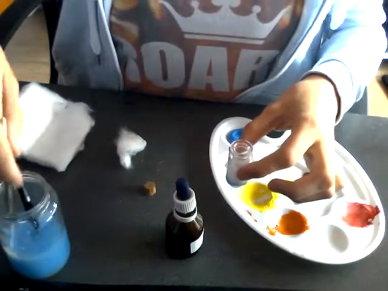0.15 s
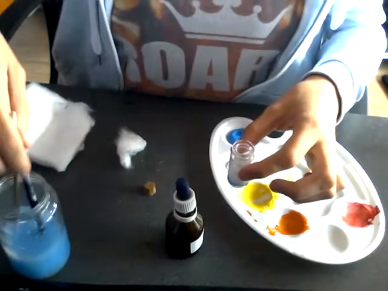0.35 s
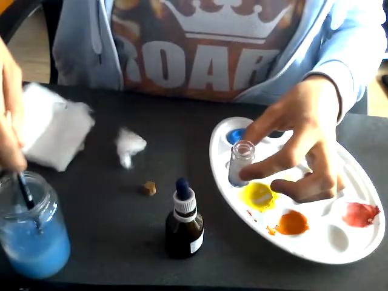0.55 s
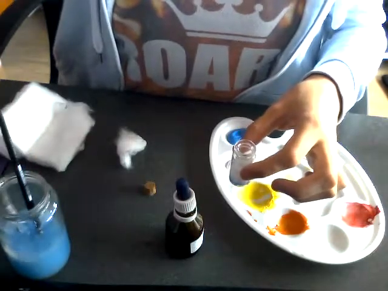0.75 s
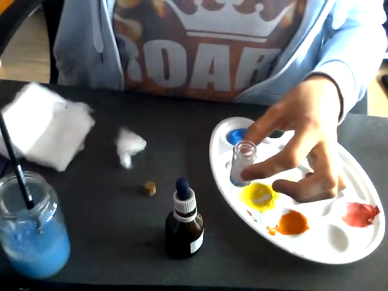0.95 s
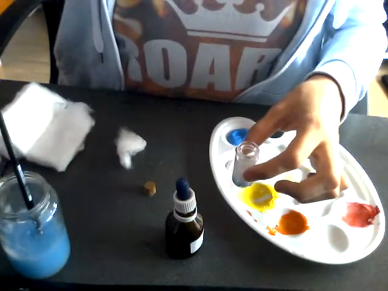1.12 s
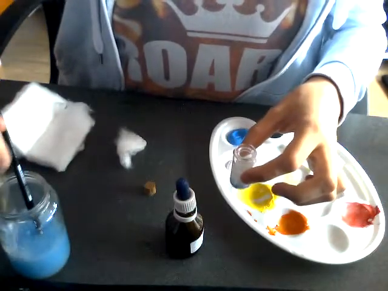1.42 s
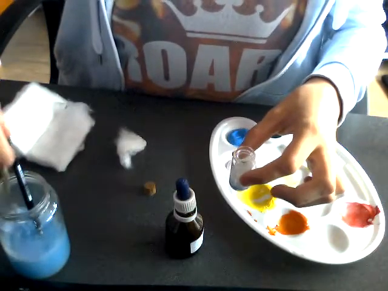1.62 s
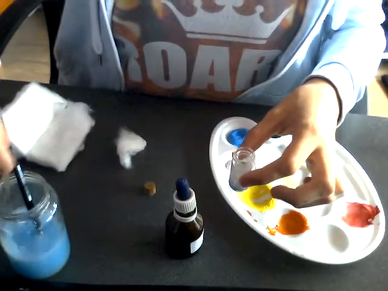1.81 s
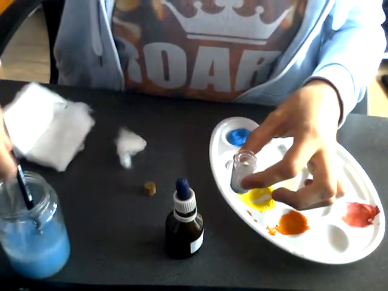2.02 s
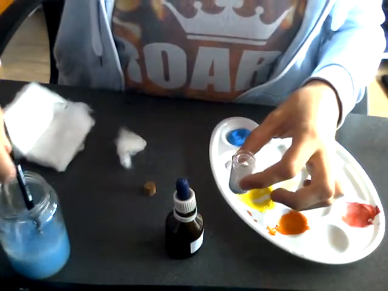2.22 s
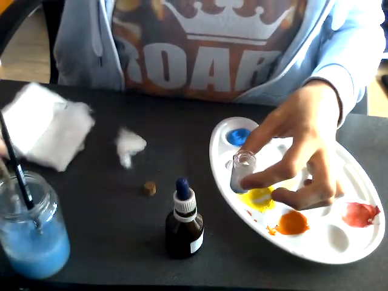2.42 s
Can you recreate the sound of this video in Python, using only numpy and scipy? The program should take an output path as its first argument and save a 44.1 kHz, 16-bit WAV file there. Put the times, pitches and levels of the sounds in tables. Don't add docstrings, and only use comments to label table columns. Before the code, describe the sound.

A paintbrush stirs water in a glass jar, heard close in a small quiet room. Light ticks lead to a bright, hard clink at 0.23 s, with gulping bubbles and knocks until 0.5. Sparser taps follow: a softer clink at 0.86, dull thumps around 1.0 and 1.25-1.45, a ringing clink at 1.53. Sloshing resumes from 1.7, with clinks at 2.13 and 2.27. Faint hiss, hum and a low throb continue underneath.

```python
import sys
import numpy as np
from scipy import signal
from scipy.fft import rfft, irfft
from scipy.io import wavfile
from scipy.ndimage import uniform_filter1d

SR = 44100
rng = np.random.default_rng(int(sys.argv[2]) if len(sys.argv) > 2 else 0)


def inscribe(sig):
    pcm = np.round(np.clip(np.atleast_2d(sig).T, -1, 1) * 32767)
    wavfile.write(sys.argv[1], SR, pcm.astype(np.int16))


def ratio_of_db(decibels):
    return 10 ** (np.asarray(decibels, float) / 20)


N = 112454
T = np.arange(6000) / SR
BINS = np.arange(513) * SR / 1024
EDGE_HZ, WIDE_EDGE_HZ = 15850, 16600
NARROW_OCTAVES = 0.05


def evened(x):
    return x / np.sqrt(np.mean(x ** 2) + 1e-20)


def read(points, hz):
    f, value = np.transpose(points)
    return np.interp(np.log(hz + 1), np.log(f + 1), value)


def add(mix, s, sound):
    part = mix[max(round(s * SR), 0):][:len(sound)]
    part += sound[:len(part)]


def coloured(x, db):
    cepstrum = irfft(np.maximum(db, -90) * np.log(10) / 20)
    cepstrum[1:512] *= 2
    cepstrum[513:] = 0
    response = irfft(np.exp(rfft(cepstrum)))
    return signal.fftconvolve(x, response)[:len(x)]


def low_passed(x, hz):
    return signal.oaconvolve(x, signal.firwin(511, hz, window=("kaiser", 9), fs=SR), "same")


def ring(db, spot_hz, octaves, length=1):
    # (f/Hz, level/dB, time to fall 60 dB/s)
    modes = [(3705, 0, 0.21), (4200, -7, 0.051), (4188, -1, 0.17), (4150, -1.5, 0.049), (5950, -0.5, 0.081),
             (6210, -6, 0.17), (6880, 3, 0.069), (7345, 0.5, 0.07), (8200, -1, 0.017), (8900, -10, 0.018),
             (9530, -8.5, 0.13), (10600, -4, 0.04), (11230, -2.5, 0.13), (13200, 1, .05)]
    hz, mode_db, t60 = np.transpose(modes)[:, :, None]
    near_db = np.maximum(-6 * (np.log2(hz / spot_hz) / octaves) ** 2, -34)
    scatter_db = 2 * rng.standard_normal(hz.shape)
    sizes = ratio_of_db(db + mode_db + near_db + scatter_db - 60 * T / (t60 * length))
    shake = evened(uniform_filter1d(rng.standard_normal(sizes.shape), size=150))
    sizes *= 1 + 0.5 * shake
    onset = np.minimum(T / 0.00065, 1)
    return (sizes * np.sin(2 * np.pi * hz * T)).sum(0) * onset


def burst(db, t60, colour_db, spike_db, wash_db):
    wash_fade = ratio_of_db(wash_db - 21.5 - 60 * T / 0.19)
    wash = wash_fade * np.minimum(T / 0.0064, 1) * rng.standard_normal(len(T))
    wash_shape_db = -6 * (np.log2((BINS + 50) / 9600)) ** 2 - 40 * (BINS > EDGE_HZ)
    wash = coloured(wash, colour_db + wash_shape_db)
    rattle = rng.standard_normal(len(T)) * ratio_of_db(-60 * T / t60)
    rattle[0] = ratio_of_db(spike_db)
    rattle = coloured(rattle, colour_db)
    return ratio_of_db(db) * (rattle + wash) / np.sqrt(np.mean(rattle[:100] ** 2))


def clinks():
    times = (.2277, .8565, 1.5272, 2.1265, 2.2714)
    levels = (-15, -31, -26, -23, -19.5)
    spikes = (15, 4, 17, 17, 15)
    washes = (-4.5, -6, -8, -4, -6)
    # (ring over crack level/dB, favoured mode f/Hz, hardness tilt/dB per octave)
    strikes = [
        (-11.5, 9500, -2.5),
        (-11, 5800, -9),
        (-8, 9400, -2),
        (-24, 9200, -3.5),
        (-30, 7900, -2.5),
    ]
    # (f/Hz, level/dB)
    crack = [(600, -31.5), (2000, -25.5), (3550, -22.5), (4550, -14), (6190, -10), (8800, 5), (12500, -1.5),
             (16500, -10)]
    out = np.zeros(N)
    for s, db, spike_db, wash_db, strike in zip(times, levels, spikes, washes, strikes):
        ring_db, spot_hz, tilt_db = strike
        colour_db = read(crack, BINS) + tilt_db * np.log2((BINS + 100) / 8000)
        add(out, s, burst(db, 0.017, colour_db, spike_db, wash_db))
        add(out, s, ring(db + ring_db, spot_hz, 0.24))
    return out


def touches():
    # (t/s, tick level/dB, tick centre f/Hz, ring over tick level/dB, favoured mode f/Hz)
    light = [(2.16, -49.5, 1720, -20, 4200), (0.039, -52, 4670, 4, 4250), (.107, -64, 6030, 0, 6880),
             (.203, -45.5, 4400, -7, 4200), (0.21, -46, 3640, -5, 5970), (0.3166, -41, 4500, -7.5, 4200),
             (.371, -41.5, 5100, -9, 5960), (0.3739, -42, 5200, -0.5, 5800), (0.381, -52, 6660, -3.5, 3700),
             (.46, -49, 3860, -7, 3740), (.4885, -54, 5000, -2, 5830), (.955, -42, 1890, 0.5, 4295),
             (1.2537, -62, 2500, 6.5, 4200), (1.368, -48, 1780, -17, 6880), (1.6705, -44.5, 2330, 0, 4020),
             (1.692, -60, 5000, -14, 4200), (1.7167, -53, 8900, -2, 4200), (1.7715, -49, 8100, -10, 8600),
             (1.8078, -57.5, 6050, 16, 8800), (1.867, -54.5, 10100, 3.5, 9650),
             (1.962, -55.5, 4000, -11, 4250), (2.097, -50, 8600, -12, 8700), (2.109, -54, 8600, -14, 4200),
             (2.243, -50, 6540, -6, 6880)]
    out = np.zeros(N)
    for s, db, tick_hz, ring_db, spot_hz in light:
        octaves_off = np.log2((BINS + 50) / tick_hz)
        floor_db = -9 - 60 * (BINS < 900)
        colour_db = np.maximum(-6 * (octaves_off / 0.64) ** 2, floor_db)
        colour_db += -5 * np.maximum(octaves_off, 0) - 40 * (BINS > EDGE_HZ)
        add(out, s, burst(db, 0.029, colour_db, 0.81, 0))
        add(out, s, ring(db + ring_db, spot_hz, NARROW_OCTAVES))
    return out


def single_modes():
    # (t/s, level/dB, favoured mode f/Hz, share of the usual ring length)
    mode_rings = [(0., -54.5, 4140, 2), (0.855, -39, 7345, 1), (.857, -52, 11230, 0.83),
                  (.857, -50, 13200, .6), (0.858, -52, 9530, .3), (.857, -47, 3705, 0.73),
                  (0.229, -26, 9530, 0.77), (1.37, -45.5, 6880, 0.34), (1.528, -37, 9530, 1),
                  (1.527, -41, 11230, 0.83), (1.528, -48, 13200, 1), (1.529, -49, 6880, .3),
                  (2.098, -53, 10600, 1), (2.11, -47.5, 4200, 0.21), (2.245, -39.5, 6880, .25),
                  (.372, -45, 7345, .2), (.372, -57.5, 11230, .5), (.317, -45.5, 4200, 0.35),
                  (.107, -59, 4200, 1), (.128, -64, 4200, 0.88), (0.228, -35, 4230, 0.59),
                  (0.23, -39, 6100, 0.78), (0.251, -41, 6000, 0.93), (0.324, -53, 6050, 1.2),
                  (.558, -62, 4260, 0.54), (0.858, -32.5, 4050, 0.4), (1.217, -66, 4200, .6),
                  (1.529, -44.5, 4200, 0.66), (1.528, -36, 5950, 0.78), (1.696, -60, 6880, 3.5),
                  (1.974, -32, 8600, 1), (2.127, -43, 4070, 0.31), (2.128, -31, 5950, 0.32),
                  (2.2442, -48, 3705, 0.35), (2.272, -40, 4200, 0.52), (2.273, -45, 5950, 1.3)]
    out = np.zeros(N)
    for s, db, spot_hz, length in mode_rings:
        add(out, s, ring(db, spot_hz, NARROW_OCTAVES, length))
    return out


def knocks():
    # (t/s, level/dB, share of the lowest mode/dB)
    thumps = [(0.0, -39, -3.5), (0.317, -42.5, 11.5), (0.323, -27.5, -1.5), (0.446, -38, -6),
              (0.855, -39, -8.5), (0.956, -28, -8), (1.216, -39, -23), (1.257, -36, -7), (1.271, -37, -13),
              (1.372, -37.5, -6), (1.388, -44.5, -7), (1.412, -41.5, 0), (1.432, -46, -9),
              (1.453, -46.5, -2), (1.673, -27, -9), (1.772, -43.5, -24), (1.865, -38, -14),
              (2.159, -38.5, -8)]
    table_hz = (276, 396.8, 629)
    table_db = (3, 1.5, -10)
    out = np.zeros(N)
    shape = (1 - np.exp(-T / 0.0024)) * ratio_of_db(-60 * T / 0.05)
    for s, db, low_db in thumps:
        modes = np.zeros(len(T))
        for hz, mode_db, extra_db in zip(table_hz, table_db, (low_db, 0, 0)):
            modes += ratio_of_db(mode_db + extra_db) * np.sin(2 * np.pi * hz * T)
        add(out, s, ratio_of_db(db + 1) * shape * modes)
    return out


def bubble(db, hz, t60, rise_s, wobble=0):
    turns = hz * (T + 3.8 * T ** 2 / 2)
    shape = ratio_of_db(db + 3.5 - 60 * T / t60) * (1 - np.exp(-T / rise_s))
    return shape * (1 + wobble) * np.sin(2 * np.pi * turns)


def gulps():
    # (t/s, level/dB, f/Hz)
    pockets = [(0.038, -37.5, 1286), (0.211, -37, 1660), (0.287, -35, 1180), (0.296, -41, 1040),
               (0.319, -34, 930), (0.358, -43, 1020), (0.371, -32.5, 1176), (0.379, -30, 942),
               (0.399, -45, 1070), (0.427, -41.5, 960), (0.446, -33, 950), (0.455, -37, 1210),
               (1.718, -32, 1126), (1.731, -39, 1100), (1.7711, -21.5, 900), (1.788, -48, 960),
               (1.8093, -35, 975), (1.815, -36.5, 975), (1.847, -37, 1200), (1.863, -38, 1820),
               (1.868, -31, 1124), (1.961, -41, 1320), (1.997, -41, 2000), (2.027, -43, 1660),
               (2.158, -34.5, 890), (2.246, -33, 985), (2.285, -41, 1160), (2.366, -43, 1620),
               (1.254, -50, 1110), (.212, -39, 2010)]
    out = np.zeros(N)
    for s, db, hz in pockets:
        wobble = 0.17 * evened(uniform_filter1d(rng.standard_normal(len(T)), size=220))
        add(out, s, bubble(db, hz, 30.2 / hz, 0.0027, wobble))
    return out


def fizz():
    # (t/s, level/dB, f/Hz)
    pings = [(0.214, -33, 8400), (.299, -37, 5300), (0.316, -28.5, 9600), (0.448, -23.5, 1310),
             (1.666, -38, 3000), (1.717, -44, 14400), (1.741, -37.5, 5600), (1.958, -27, 8500),
             (1.96, -44, 8800), (1.968, -30, 8700), (2.017, -43, 6100), (2.097, -33, 3080),
             (1.369, -31, 1840), (1.369, -60, 2880), (1.809, -42, 2590), (1.809, -39, 3770),
             (1.525, -35, 2140), (1.718, -36.5, 2060), (1.962, -41, 2150), (1.671, -45, 1840),
             (0.379, -34.5, 2200)]
    out = np.zeros(N)
    for s, db, hz in pings:
        add(out, s, bubble(db - 4, hz, 0.012, 0.0015))
    return out


def slosh():
    # (t/s, level/dB)
    stir = [(.18, -63), (.22, -53), (.45, -58), (.56, -69), (1.64, -83), (1.7, -56), (1.9, -55.5),
            (2.03, -56.5), (2.1, -76), (2.3, -55), (2.42, -88)]
    pitch_range = (790, 5000)
    out = np.zeros(N)
    stir_db = np.interp(np.arange(N) / SR, *np.transpose(stir))
    spread_db = 3.5 * np.minimum(rng.exponential(1, N), 4)
    starts = rng.random(N) < 500 / SR
    drops = starts * ratio_of_db(spread_db + stir_db)
    kind = rng.integers(0, 24, N)
    for k, hz in enumerate(np.geomspace(*pitch_range, 24)):
        tone = bubble(2.8, hz, 12 / hz, 0.00091)[:2048]
        out += signal.oaconvolve(drops * (kind == k), tone)[:N]
    return out


def room(x):
    tail = rng.standard_normal(len(T)) * ratio_of_db(-60 * T / 0.23) * (T > 0.0045)
    return signal.fftconvolve(x, tail / np.linalg.norm(tail))[:N]


def background():
    # (f/Hz, level/dB)
    floor = [(12, -56), (20, -8.5), (90, -3), (145, -11), (308, -18), (397, -26), (496, -20.5), (733, -27),
             (15800, -43)]
    # (centre f/Hz, width/Hz, level/dB)
    hums = [
        (46, 7.1, -61.5),
        (91, 43, -72),
        (379, 173, -62),
    ]
    hz = np.fft.rfftfreq(N, 1 / SR)
    t = np.arange(N) / SR
    noise = rfft(rng.standard_normal(N))
    out = ratio_of_db(-50) * evened(irfft(noise * ratio_of_db(read(floor, hz)), N))
    for centre_hz, width_hz, db in hums:
        peak = 1 / (1 + (2 * (hz - centre_hz) / width_hz) ** 2)
        out += ratio_of_db(db) * evened(irfft(rfft(rng.standard_normal(N)) * peak, N))
    out += ratio_of_db(-51.5 + 1.5) * np.sin(2 * np.pi * 49.36 * t)
    throb_db = 25 * (np.cos(2 * np.pi * (t - 0.18) / 0.4707) - 1)
    out += ratio_of_db(-45 + throb_db) * np.sin(2 * np.pi * 98.3 * t)
    return low_passed(out, EDGE_HZ)


def scene():
    jar = clinks() + touches() + single_modes()
    wet = knocks() + gulps() + fizz() + slosh()
    near = jar + wet + ratio_of_db(-11.5) * room(wet)
    return (low_passed(near, WIDE_EDGE_HZ) + background())[None]


def band_limit(x):
    return signal.sosfilt(signal.butter(12, 17030, fs=SR, output="sos"), x)


def record(dry):
    return band_limit(dry)


dry = scene()
out = record(dry)
inscribe(out)
```